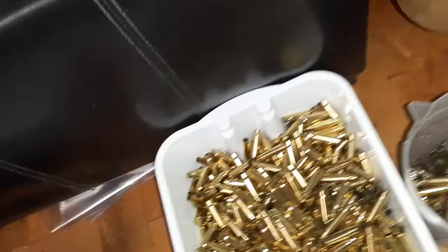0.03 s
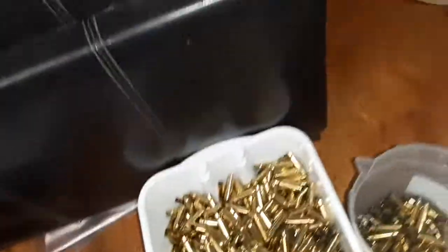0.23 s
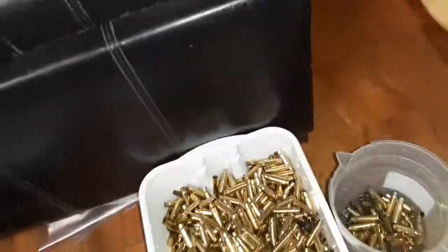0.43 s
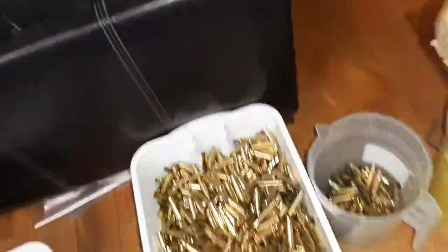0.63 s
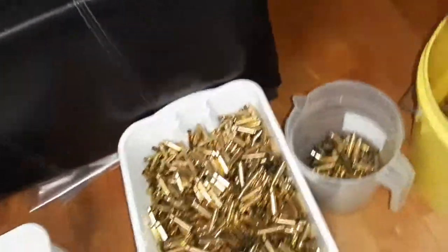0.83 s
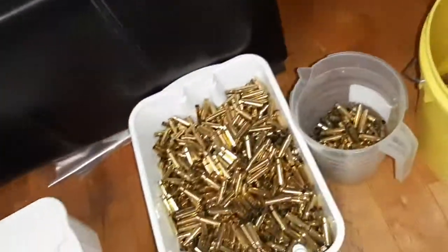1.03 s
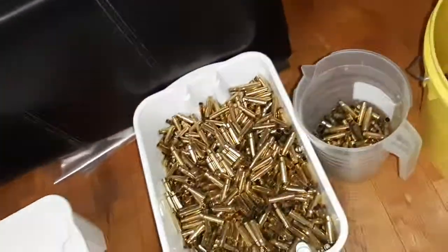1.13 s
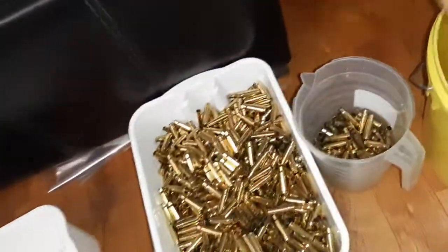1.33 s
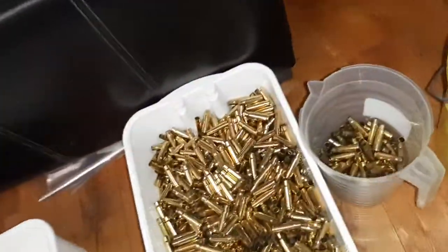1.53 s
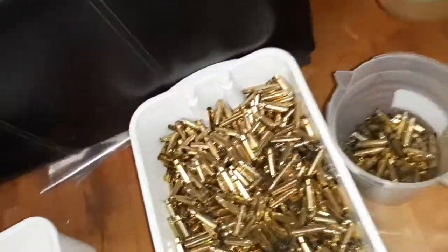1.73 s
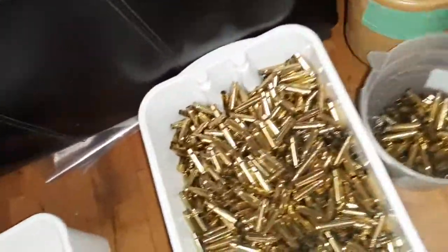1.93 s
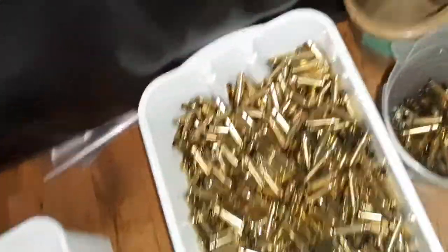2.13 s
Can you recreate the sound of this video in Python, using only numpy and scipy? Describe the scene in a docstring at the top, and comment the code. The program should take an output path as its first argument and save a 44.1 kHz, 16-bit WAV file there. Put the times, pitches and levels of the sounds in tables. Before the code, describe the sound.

Empty brass cartridge cases rattle with very high, glassy clinks. From 0 to 1.05 seconds they tumble unevenly in a plastic jug, knocking hollowly, with busy bursts near 0.4, 0.7 and 1.0. Around 1.1 to 1.25 they spill into a tub of cases, a dense bright clatter with dull thuds. It thins by 1.45; faint ticks settle until about 2.2 over a soft room hush. Close, dry, slightly right.

```python
"""Thin brass tubes clink very high and a plastic jug booms hollowly: empty cartridge cases are stirred and shaken,
then tipped into a tub of others on a wooden floor, which thuds; a few cases settle in a quiet room.
Blows are noise bursts plus ringing modes of the jug or tub; the tumble is thousands of tiny random contacts.
The brass is pairs of fading sines, the floor low thuds and filtered noise, the room a set of echoes and a hush."""
import sys
import numpy as np
from scipy import signal
from scipy.fft import rfft, irfft, next_fast_len
from scipy.io import wavfile

SR = 44100
rng = np.random.default_rng(int(sys.argv[2]) if len(sys.argv) > 2 else 0)


def transcribe(signal):
    """Save signal, clipped to [-1, 1], as a 16-bit WAV file at the path in sys.argv[1]."""
    frames = np.atleast_2d(signal).T
    limited = np.clip(frames, -1, 1)
    pcm = np.round(limited * 32767).astype(np.int16)
    wavfile.write(sys.argv[1], SR, pcm)


N = 97020

# Levels in the tables and settings are those fed in, before later filters, left/right gains and mix gains.
# cases knock on the jug wall: (t/s, blow level/dB, then relative to it: boom/dB, low crack/dB, bright crack/dB)
JUG_KNOCKS = [(0.0354, -37, -5.5, -21, 18), (0.0593, -17, -19.5, -52, 2), (0.1964, -44, 10.5, -16, -21),
              (0.234, -44.5, -6, 33, -16), (0.2546, -29.5, 5.5, 13, -25.5), (0.2647, -29, 5.5, 19.5, -17),
              (0.2784, -34, 5.5, -11, -22), (0.2904, -24, 0.5, -24, -7.5), (0.3019, -37.5, 11.5, -21, 23),
              (0.3454, -23, -20, -38, -17), (0.3647, -15.5, -13, -2, -12), (0.3707, -18, -2.5, -6, -25),
              (0.377, -13, -7.5, 7, -28), (0.3944, -17, -2.5, -18, 4), (0.4177, -31.5, 2, -2, -17),
              (0.4442, -28.5, 1.5, 3, 9), (0.4545, -14.5, -8, 2, 7), (0.4964, -39.5, 3, -10.5, -25.5),
              (0.5047, -31, 0.5, -31.5, 9.5), (0.5398, -42.5, 17.5, -3, -14.5),
              (0.6451, -26, -2, 14, -20.5), (0.6537, -26.5, 3.5, 18.5, -14), (0.687, -16, -10, 14, -28),
              (0.7025, -22, -9, 19, -21), (0.7109, -24, -6, -2, -30.5), (0.7215, -19, -4.5, 14, -15.5),
              (0.731, -13, -22, -6, -24), (0.7555, -28, 4.5, -21.5, -15), (0.7836, -18.5, -18, -13, -27.5),
              (0.8199, -25, -9.5, -30, -29), (0.8884, -16.5, -5.5, -41.5, -34.5),
              (0.9176, -18, -7.5, -26, -36), (0.9405, -17, -7, -14, -25.5), (0.9709, -19.5, -9, -15, -32),
              (0.9787, -9.5, -14.5, -30, -27.5), (0.9935, -15, -18.5, -29.5, -33),
              (1.0011, -9.5, -14, -41, -26.5), (1.0268, -42, -22, -20.5, -35.5)]
# cases land in the tub and settle: (t/s, blow level/dB, then relative to it: thud/dB, low and bright crack/dB)
TUB_LANDINGS = [(1.1118, -18, -30, -19, -17), (1.1182, -11.5, -34, -5, 0), (1.1332, -16.5, -8.5, -13, 6.5),
                (1.1544, -13.5, -11.5, -7, 5), (1.1634, -13, -11.5, -27.5, -23),
                (1.169, -22, -4.5, -9.5, -14.5), (1.181, -21, -1, 8, 12), (1.2018, -16, -23, -33, -16.5),
                (1.2275, -16.5, -12.5, -20.5, 9), (1.2385, -26, -6, -19.5, 18.5),
                (1.2431, -15.5, -12, 4.5, -18), (1.2472, -14.5, -30, -18.5, -9),
                (1.4285, -32, -36, -7, 4.5), (1.567, -41, -19, -27, 8.5), (1.5928, -37, -35, -36, 7),
                (1.7344, -59, 5.5, 5, -30), (1.8622, -35, -21, -3, -15), (1.8665, -27, -11, -7, -1),
                (1.8755, -29, -35, -31.5, 3), (1.991, -55.5, 8.5, 19, -27), (2.1954, -39.5, -1.5, 0, -21)]
# ways the jug rings: (f/Hz, level/dB, t60/s); the first three are the hollow boom
JUG_MODES = [(414, 1, 0.1), (437, 0, 0.08), (505, -10, 0.04), (1680, -9, .03), (2005, -2, .09),
             (2048, 0, 0.16), (2144, -6, 0.09), (2253, -6, 0.06), (2540, -8, 0.04), (4630, -12, 0.03)]
# ways the tub rings: (f/Hz, level/dB, t60/s); the first three are the thud
TUB_MODES = [(190, -2, .03), (300, -2, .03), (430, -3, .025), (1550, -6, .025), (2050, -9, .02),
             (2900, -12, .012), (3440, -13, .012)]
# edges of the five bands of a crack: (f/Hz)
CRACK_EDGES_HZ = (500, 1300, 2300, 3800, 6500, 15000)
# how hard the cases tumble: (t/s, rattle level/dB, brass ring level/dB, vessel boom level/dB, floor rumble level/dB)
TUMBLE = [(0.0, -36, -30.5, -38, -61), (0.07, -39, -69, -40, -56), (0.15, -57, -69, -54.5, -62),
          (0.17, -46, -42, -40.5, -56), (0.258, -39.5, -59, -31.5, -69), (0.28, -37, -38, -52, -66),
          (0.39, -40, -33, -33, -51), (0.43, -33.5, -41, -28.5, -45), (0.479, -31.5, -34.5, -30.5, -73),
          (0.598, -48, -72.5, -38.5, -82), (0.67, -36.5, -36, -43.5, -55.5),
          (0.729, -25.5, -38, -35.5, -37), (0.8, -36, -38, -33.5, -50), (0.839, -35, -41.5, -45.5, -49),
          (0.869, -43, -54.5, -49, -77), (0.97, -27, -33, -40, -68.5), (1.05, -37.5, -43.5, -46, -69),
          (1.1, -52.5, -34, -49.5, -69), (1.131, -26.5, -29, -54, -42), (1.19, -27.5, -29, -64.5, -38.5),
          (1.259, -33.5, -27, -58, -55), (1.36, -45.5, -44.5, -63.5, -83), (1.439, -58.5, -50, -63, -67.5),
          (1.5, -78, -87, -78, -75.5), (1.65, -62.5, -103, -72, -69), (1.97, -98, -103.5, -63, -64),
          (2.07, -94.5, -89, -59.5, -57), (2.2, -81, -94, -61.5, -72.5)]
# the heap shifts softly by itself: (t/s, half length/s, rattle level/dB)
HEAP_SHIFTS = [(1.3, 0.041, -37), (1.372, 0.032, -47), (1.64, 0.077, -62.5), (1.905, 0.029, -53.5),
               (2.041, 0.076, -60)]
# colour of the small contacts: (f/Hz, level/dB)
GRAIN_COLOUR = [(290, -43), (500, -17), (690, -18.5), (1790, -9.5), (2010, -12), (8040, -15.5),
                (9520, -20.5), (14300, -18.5)]
# cases ring out: (t/s, level/dB, upper ring f/Hz, then relative to the level: lower ring/dB, long ring/dB)
CLINKS = [(0.0558, -25, 15600, -8, -20), (0.2917, -18, 15450, -9, -22), (0.39, -18, 15150, -7, -20),
          (0.4733, -19, 15450, -11, -35), (0.6629, -28, 15450, -10, -17), (0.7297, -18, 15300, -12, -22),
          (0.8375, -23, 15170, -20, -30), (0.9892, -15, 15450, -22, -26), (1.046, -24, 15450, -16, -36),
          (1.1194, -19, 14950, -22, -32), (1.1328, -16, 15730, -26, -24), (1.1648, -18, 15050, -16, -23),
          (1.1907, -19, 15000, -13, -27), (1.2336, -16, 15250, -16, -13), (1.294, -23, 14900, -13, -18),
          (1.5693, -48, 15100, -9, -3), (1.8761, -47, 15600, -15, -34)]
# a case struck side-on clicks with a short pitch: (t/s, level/dB, f/Hz)
SIDE_TICKS = [(0.3002, -21.5, 4850), (0.3456, -22, 4930), (0.3701, -21, 3960), (0.3765, -20, 3810),
              (0.4557, -20.5, 3880), (0.6888, -20, 2070), (0.7116, -17.5, 2240), (0.7307, -24, 2800),
              (0.7836, -29, 2900), (0.8274, -24.5, 2300), (0.8879, -16.5, 2340), (0.9186, -12, 2450),
              (0.9722, -22, 2750), (0.9932, -18.5, 2634), (1.002, -26, 2550), (1.302, -26.5, 1560),
              (1.4282, -38.5, 2790), (1.435, -38, 2910), (1.4835, -53, 2640), (1.5688, -43.5, 3420),
              (1.584, -44, 2940), (1.591, -45.5, 2980), (2.001, -49, 1500)]
# low bumps of the vessels: (t/s, level/dB, f/Hz)
VESSEL_BUMPS = [(0.428, -26, 48.6), (0.8, -36, 105), (1.136, -19, 74.5), (1.179, -20.5, 61),
                (1.24, -30.5, 56.5), (2.08, -50, 56)]
# colour of the quiet room: (f/Hz, level/dB)
HUSH_COLOUR = [(18, -30.5), (30, -12), (123, -5), (1020, -12), (1330, -11.5), (4420, -16), (8060, -27),
               (8720, -34), (15500, -41)]

TIPPED_S = 1.09  # from here on the cases are in the tub
LEFT_DB, LEFT_LAG_S, SCATTER_DB = -5, .00027, 3  # left against right, and how much that varies

# blows and tumble
CRACK_T60_S, CRACK_DB, BODY_DB = .019, -14, -6
TINT_DB = 3  # every blow has its own colour in the middle bands
RISE = 0.021  # share of the remaining height that a burst gains per sample
TOUCHES_PER_S, TOUCH_SPREAD_DB = 2400, 3.3
GRAIN_T60_S, GRAIN_CYCLES = .007, 20  # a pitched grain dies away over this many cycles

# brass
CLINKS_PER_S = 1500
UPPER_HZ, UPPER_T60_S = (14700, 15780), .15  # range of the upper ring over all cases
JUG_LOWEST_HZ = 15000  # in the jug, the random ringing uses only cases above this
LOWER_RATIO, LOWER_DB, LOWER_T60_S = .613, -10, 0.22
BEND_HZ, BEND_T60_S, BEND_SPLIT_HZ = 8515, 0.31, 34  # long ring that all listed clinks share
CLINK_T60_S, CLINK_RISE_S, CLINK_SPREAD_HZ, CLINK_SPREAD_S = .12, .003, 350, .02
PARTNER_DB = -5  # the cases that are struck ring too
JOSTLE_DB = 2
TICK_T60_S, TICK_OVERTONE, TICK_OVERTONE_DB = .022, 1.8, -11

# floor and room
BUMP_T60_S, RUMBLE_HZ = 0.055, (69.4, 127.5)
ROOM_T60_S, ROOM_DB, WALL_CUT_HZ = 0.14, -11, 16000  # t60 before the walls dull the treble
HUSH_DB = -70.5
WHINE_HZ, WHINE_DB, WHINE_T60_S = 1390, -72, 0.082  # faint wavering tone in the room
WHINE_S, WHINE_SPAN_S = 1.68, .2  # middle and width of its swell
STOP_HZ = 16250  # from here up the sound is at least 60 dB down


def struck(events, modes, floor_hz):
    """A blow makes a noisy crack in five bands and sets every mode of the vessel ringing at its own strength."""
    s, db, boom_db, low_db, bright_db = np.transpose(events)
    luck = rng.standard_normal((len(s), len(modes) + 4))
    pan_db = LEFT_DB + SCATTER_DB * luck[:, -1]
    middle_db = TINT_DB * luck[:, -4:-1].T
    out = np.zeros((2, N))
    for rel_db, low, high in zip([low_db, *middle_db, bright_db], CRACK_EDGES_HZ, CRACK_EDGES_HZ[1:]):
        noise = band(crack(train(s, db + rel_db, pan_db), CRACK_T60_S), low, high)
        out += noise * amp(CRACK_DB) * np.sqrt(SR / (high - low))  # narrow bands are lifted
    for k, (hz, level_db, t60) in enumerate(modes):
        strength_db = boom_db if k < 3 else BODY_DB + 3.0 * luck[:, k]
        out += ring(train(s, db + level_db + strength_db, pan_db), hz, t60)
    return band(band(out, floor_hz, 21000), floor_hz, 18000)


def crack(clicks, t60):
    """Each contact is a short burst of noise, partly shared by both sides."""
    fall = amp(-60 / (t60 * SR))
    burst = np.sqrt(signal.lfilter([1], [1, -fall ** 2], clicks ** 2 + 1e-18))  # energies add up
    burst = signal.lfilter([RISE], [1, RISE - 1], burst)
    shared, own = rng.standard_normal(N), rng.standard_normal((2, N))
    return burst * (0.23 * shared + 0.84 * own)


def vessel(clicks, part):
    """The chosen modes answer the contacts: those of the jug until the tipping, then those of the tub."""
    in_jug = np.arange(N) < TIPPED_S * SR
    out = 0
    for modes, inside in ((JUG_MODES, in_jug), (TUB_MODES, ~in_jug)):
        tones = sum(amp(db) * ring(clicks, hz, t60) for hz, db, t60 in modes[part])
        out = out + rms_one(tones) * inside
    return out


def rattle(rattle_db, boom_db):
    """The dense tumble: small contacts, each of its own pitch, that also excite the vessel."""
    clicks, dealt = touches(TOUCHES_PER_S), rng.integers(0, 20, N)
    bursts = rms_one(crack(clicks, GRAIN_T60_S))
    pitched = 0
    for k, hz in enumerate(np.geomspace(600, 12000, 20)):
        pitched = pitched + ring(clicks * (dealt == k), hz, GRAIN_CYCLES / hz) * np.sqrt(hz)
    grains = rms_one(colour(bursts + rms_one(pitched), GRAIN_COLOUR))
    boom, body = vessel(clicks, slice(3)), vessel(clicks, slice(3, None))
    boom = band(band(boom, 247, 1400), 190, 1500)
    return amp(rattle_db) * (0.93 * grains + 0.84 * body) + amp(boom_db) * boom


def touches(rate):
    """Random contacts of uneven size, scattered across the heap; rms 1."""
    sizes = amp(TOUCH_SPREAD_DB * np.minimum(rng.exponential(1, N), 4.0)) * rng.choice([-1, 1], N)
    happens = rng.random(N) < rate / SR
    return rms_one(sizes * happens * sides(LEFT_DB + SCATTER_DB * rng.standard_normal(N)))


def brass(ring_db):
    """Random and listed rings together; neighbours jostle the ring, so its level flutters."""
    ringing = random_rings(ring_db) + clinks()
    jostle = rms_one(band(rng.standard_normal((2, N)), 21, 120))
    return ringing * amp(JOSTLE_DB * jostle)


def random_rings(ring_db):
    """Many slightly different cases ring at random, dealt out over 24 pitches."""
    clicks, dealt = amp(ring_db) * touches(CLINKS_PER_S), rng.integers(0, 24, N)
    scale = np.sqrt(4 * np.log(1000) / (UPPER_T60_S * SR))  # evens out the build-up of a long ring
    out, in_tub = np.zeros((2, N)), np.arange(N) > TIPPED_S * SR
    for k, hz in enumerate(np.linspace(*UPPER_HZ, 24)):
        allowed = in_tub | (hz > JUG_LOWEST_HZ)
        left, right = 1.49 * scale * case(clicks * (dealt == k) * allowed, hz)
        out += np.array([np.roll(left, rng.integers(0, 5)), right])  # left up to 4 samples late
    return out


def case(clicks, hz):
    """One brass tube has an upper ring and a weaker, longer lower ring."""
    return ring(clicks, hz, UPPER_T60_S) + amp(LOWER_DB) * ring(clicks, hz * LOWER_RATIO, LOWER_T60_S)


def clinks():
    """The clearest clinks are fading sines, five cases to a clink, with a long ring of two close, beating tones."""
    t = np.arange(SR // 2) / SR
    out = np.zeros((2, N + len(t)))
    for (s, db, hz, lower_db, bend_db), luck in zip(CLINKS, rng.random((len(CLINKS), 12))):
        turn = 2 * np.pi * (t + luck[:2, None] / 3000)  # each microphone hears its own phase
        one = amp(-60 * t / CLINK_T60_S) * np.sin(hz * turn)
        one += amp(lower_db - 60 * t / LOWER_T60_S) * np.sin(LOWER_RATIO * hz * turn)
        for pitch, late in luck[4:].reshape(-1, 2):
            other_hz = np.clip(hz + CLINK_SPREAD_HZ * (2 * pitch - 1), *UPPER_HZ)
            since = t - late * CLINK_SPREAD_S
            level = amp(PARTNER_DB - 60 * since / CLINK_T60_S) * np.clip(since / CLINK_RISE_S, 0, 1)
            one += level * np.sin(other_hz * turn)
        bend = np.sin(BEND_HZ * turn) + 0.23 * np.sin((BEND_HZ + BEND_SPLIT_HZ) * turn)
        one += amp(bend_db - 60 * t / BEND_T60_S) * bend
        gain = amp(db) * sides(LEFT_DB + 6.6 * (luck[3] - .5))[:, None] * np.minimum(t / CLINK_RISE_S, 1)
        start = int(s * SR)
        out[:, start:start + len(t)] += gain * one
    return out[:, :N]


def ticks():
    """Each listed click rings briefly at its own pitch and a weaker overtone that fades twice as fast."""
    out, pan_db = np.zeros((2, N)), np.array([LEFT_DB])
    for s, db, hz in SIDE_TICKS:
        at = np.array([s])
        out += ring(train(at, db, pan_db), hz, TICK_T60_S)
        out += ring(train(at, db + TICK_OVERTONE_DB, pan_db), hz * TICK_OVERTONE, TICK_T60_S / 2)
    return out


def bumps(rumble_db):
    """Soft low thuds ring briefly, and low noise rumbles through the floor, stronger on the right."""
    thuds = np.zeros((2, N))
    for s, db, hz in VESSEL_BUMPS:
        thuds += ring(train(np.array([s]), np.array([db]), np.array([-15.0])), hz, BUMP_T60_S)
    noise = rms_one(band(rng.standard_normal(N), *RUMBLE_HZ))
    rumble = amp(rumble_db) * noise * sides(-11.0)[:, None]
    return band(thuds, 60, 340) + 0.56 * rumble


def room(x):
    """Walls send the sound round eight feedback delays a side, duller on every round."""
    out, dull = np.zeros((2, N)), np.exp(-2 * np.pi * WALL_CUT_HZ / SR)
    for k, lag in enumerate((rng.uniform(.008, .03, 16) * SR).astype(int)):
        loop, gain, state = x.copy(), amp(-60 * lag / SR / ROOM_T60_S), [0.]
        for i in range(lag, N, lag):
            back, state = signal.lfilter([gain * (1 - dull)], [1, -dull], loop[i - lag:i], zi=state)
            loop[i:i + lag] += back[:N - i]
        out[k % 2] += (loop - x) * (-1) ** (k // 2)  # echoes only
    return out


def quiet_room():
    """A steady coloured hush, partly shared by both sides, and a faint tone of narrow noise that swells once."""
    t = np.arange(N) / SR
    white = rng.standard_normal((3, N))
    hush = amp(HUSH_DB) * rms_one(colour(0.65 * white[0] + 0.51 * white[1:], HUSH_COLOUR))
    swell = np.exp(-((t - WHINE_S) / WHINE_SPAN_S) ** 2)
    whine = amp(WHINE_DB) * rms_one(ring(white[0], WHINE_HZ, WHINE_T60_S)) * swell
    return hush + whine


def amp(db):
    """Gain of a level in dB."""
    return 10 ** (np.asarray(db) / 20)


def rms_one(x):
    """Scaled to rms 1."""
    return x / np.sqrt(np.mean(x ** 2) + 1e-20)


def sides(pan_db):
    """Left and right gains for a level difference."""
    return amp(np.array([pan_db, -pan_db]) / 2)


def train(s, db, pan_db):
    """Stereo clicks at the given times."""
    out = np.zeros((2, N))
    at = np.minimum((s * SR).astype(int), N - 1)
    np.add.at(out, (slice(None), at), amp(db) * sides(pan_db))
    return out


def ring(clicks, hz, t60):
    """A unit click sets a fading sine of starting height 1 ringing."""
    r, w = amp(-60 / (t60 * SR)), 2 * np.pi * hz / SR
    return signal.lfilter([0, np.sin(w)], [1, -2 * r * np.cos(w), r * r], clicks + 1e-18)


def band(x, low_hz, high_hz):
    """Butterworth band-pass."""
    return signal.sosfilt(signal.butter(2, [low_hz, high_hz], "band", fs=SR, output="sos"), x)


def colour(x, points):
    """Filter with the given spectrum that never sounds ahead of its input (minimum phase)."""
    size = next_fast_len(N + 4096)
    hz = np.maximum(np.arange(size // 2 + 1) * SR / size, 1)
    point_hz, point_db = np.array(points).T
    level_db = np.interp(np.log(hz), np.log(point_hz), point_db)
    cepstrum = irfft(level_db * np.log(10) / 20, size)
    cepstrum[1:size // 2] *= 2  # fold the backward half onto the forward half
    cepstrum[size // 2 + 1:] = 0
    return irfft(rfft(x, size) * np.exp(rfft(cepstrum)), size)[..., :N]


def scene():
    """Everything at two microphones; the left one hears the near sounds a little later."""
    t = np.arange(N) / SR
    s, *columns = np.transpose(TUMBLE)
    rattle_db, ring_db, boom_db, rumble_db = [np.interp(t, s, c) for c in columns]
    for at_s, span_s, db in HEAP_SHIFTS:
        rattle_db = np.maximum(rattle_db, db - 10 * ((t - at_s) / span_s) ** 2)
    near = struck(JUG_KNOCKS, JUG_MODES, floor_hz=240) + struck(TUB_LANDINGS, TUB_MODES, floor_hz=110.7)
    near += rattle(rattle_db, boom_db) + brass(ring_db) + ticks() + bumps(rumble_db)
    near[0] = np.roll(near[0], int(round(LEFT_LAG_S * SR)))
    around = amp(ROOM_DB) * room(near.mean(axis=0)) + quiet_room()
    return near + around * sides(LEFT_DB)[:, None]


def record(dry):
    """Peaks are rounded, then a steep filter cuts the top."""
    top_cut = signal.cheby2(16, 60, STOP_HZ, fs=SR, output="sos")
    return signal.sosfilt(top_cut, np.tanh(dry))


dry = scene()
out = record(dry)
transcribe(out)
```